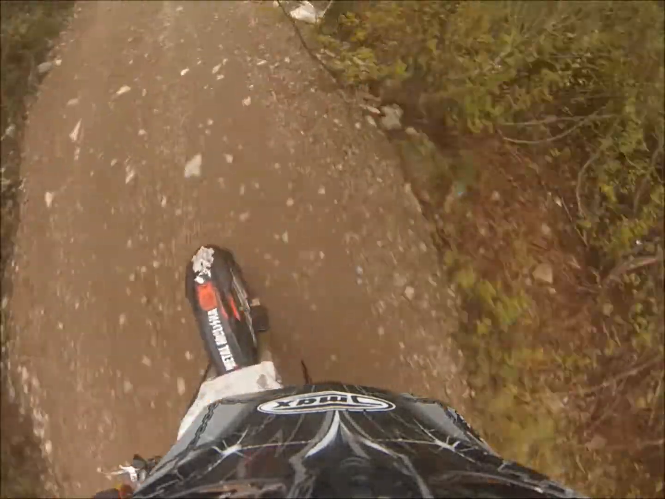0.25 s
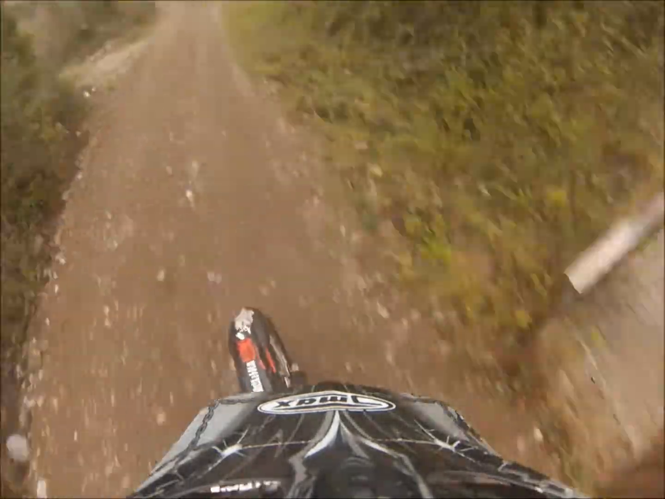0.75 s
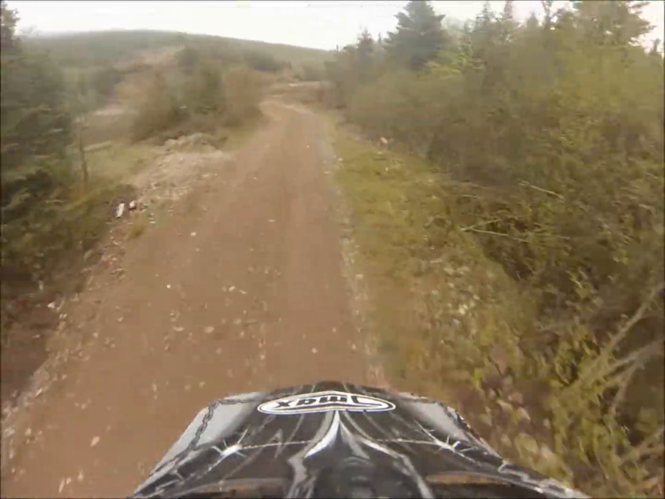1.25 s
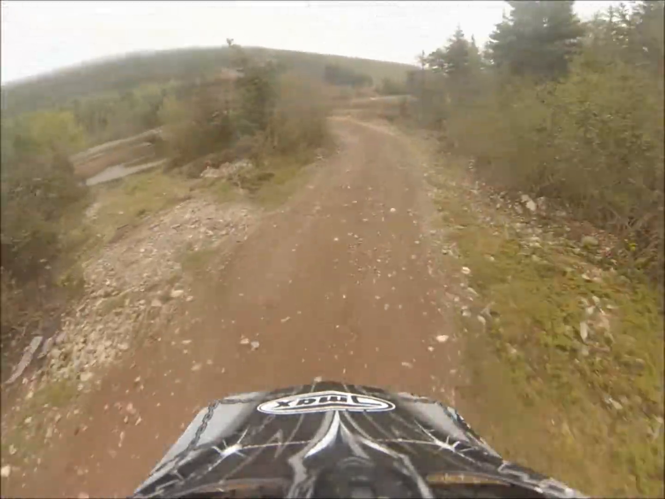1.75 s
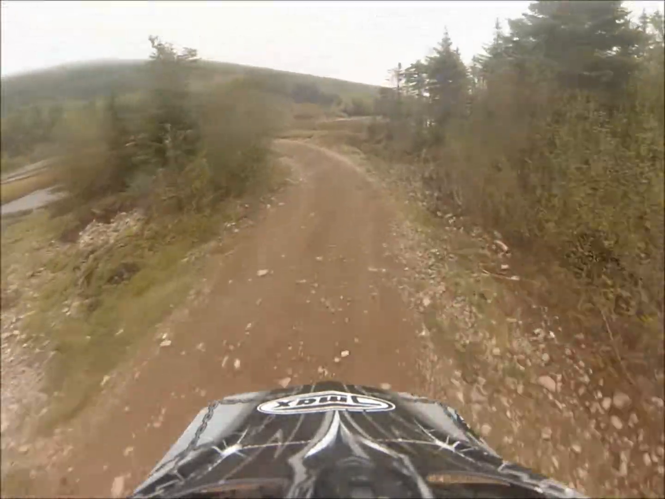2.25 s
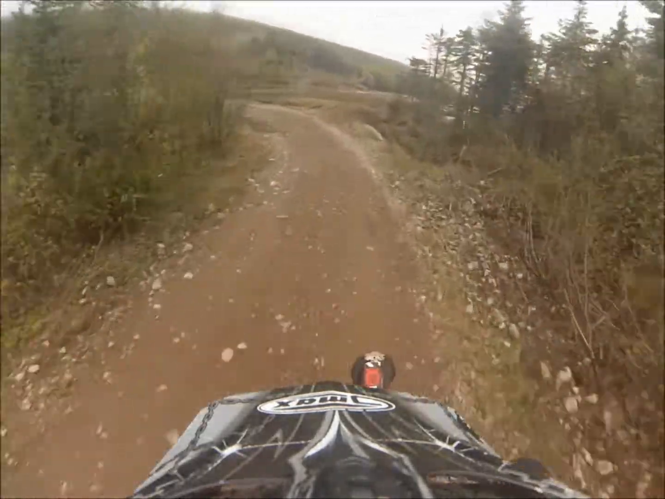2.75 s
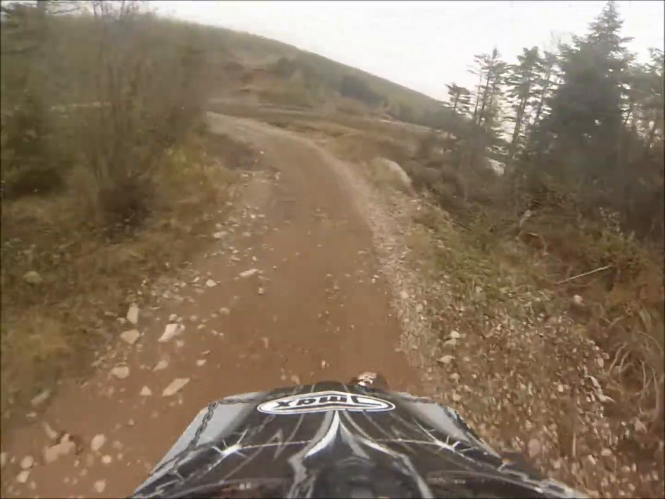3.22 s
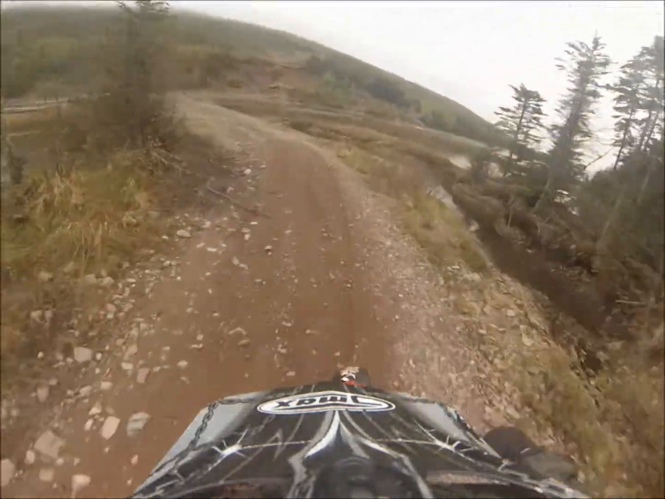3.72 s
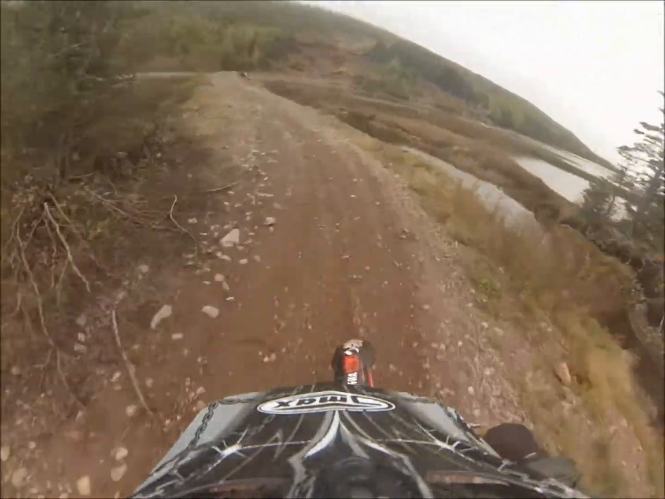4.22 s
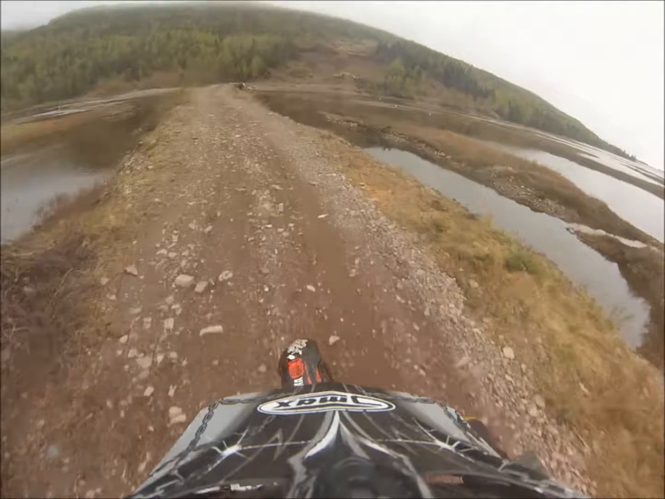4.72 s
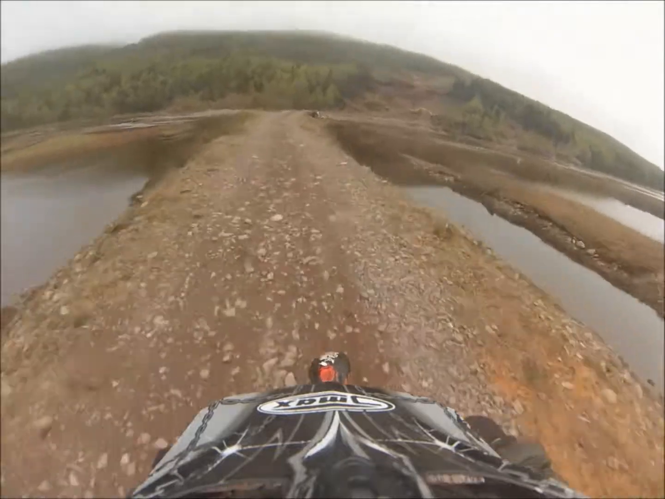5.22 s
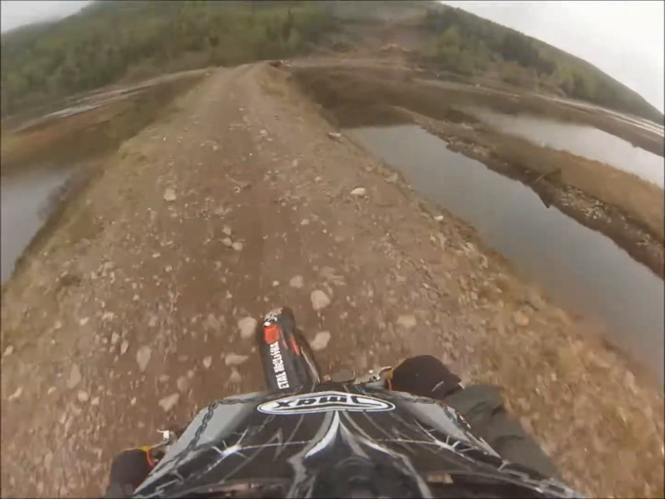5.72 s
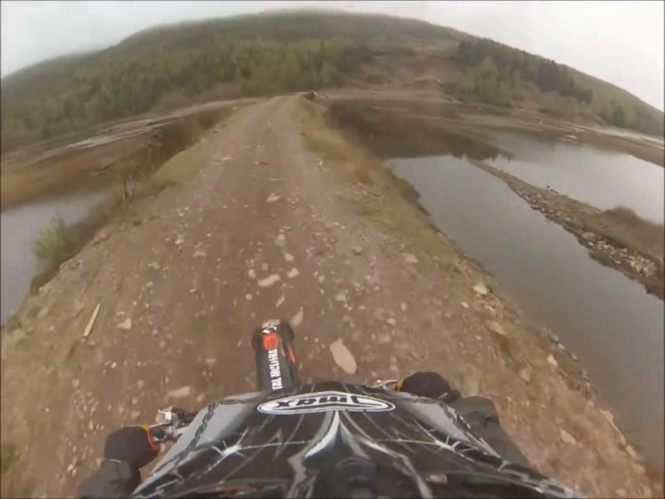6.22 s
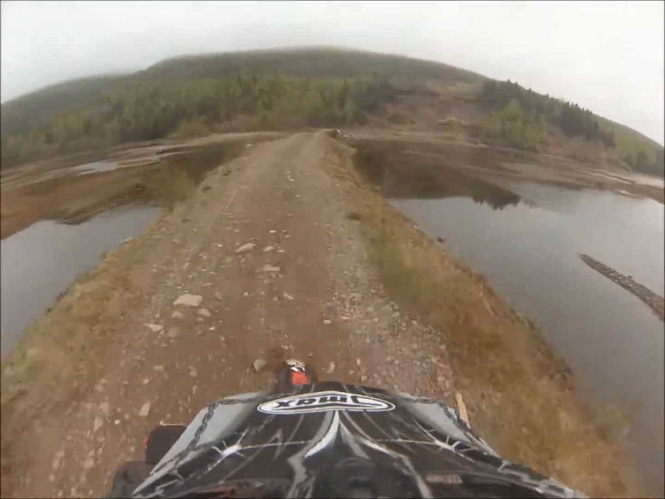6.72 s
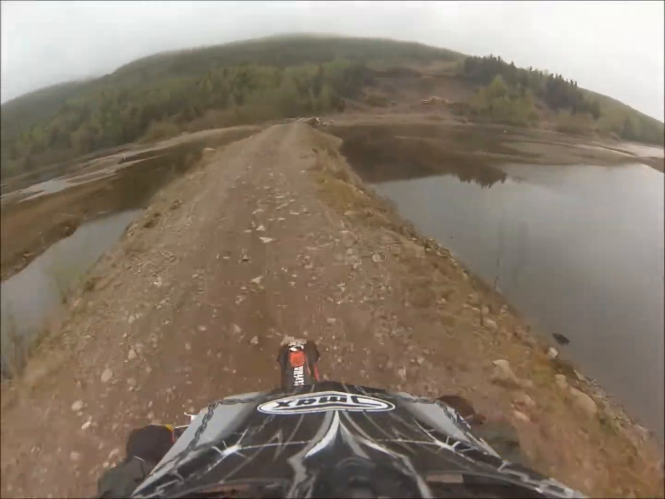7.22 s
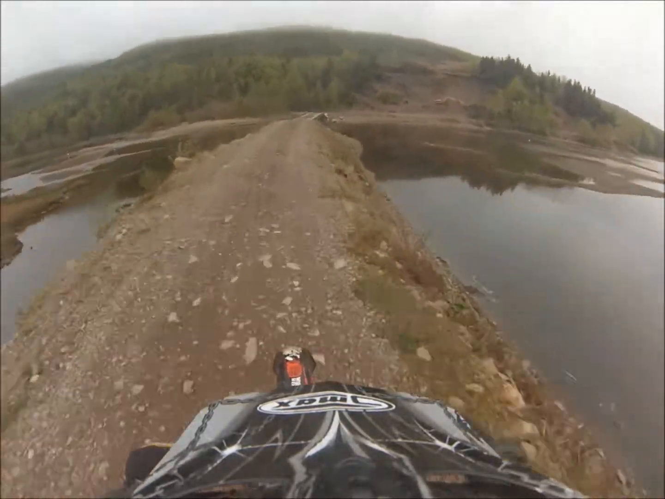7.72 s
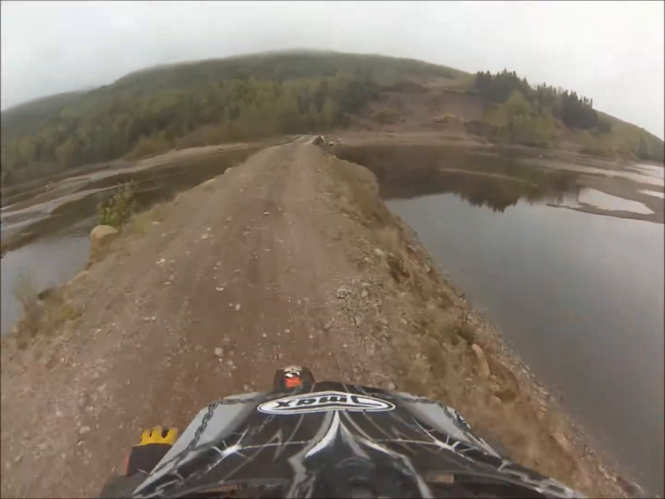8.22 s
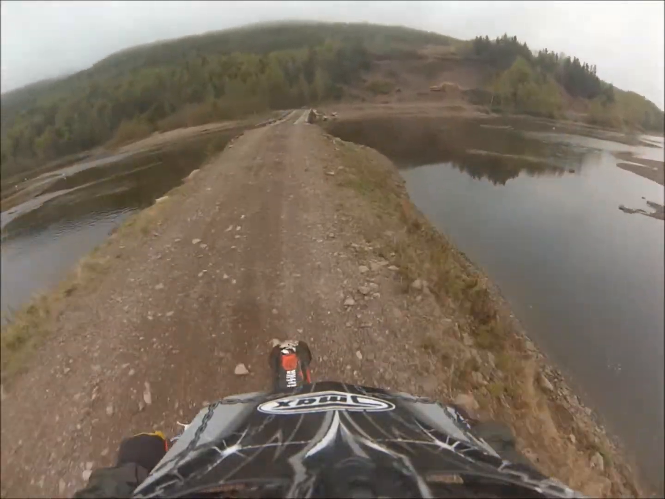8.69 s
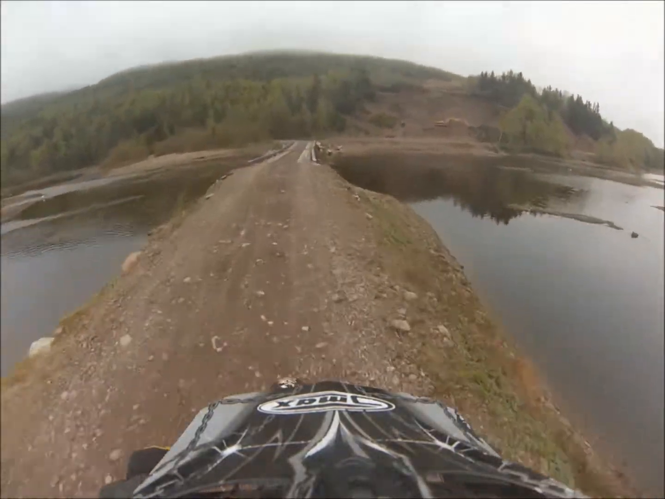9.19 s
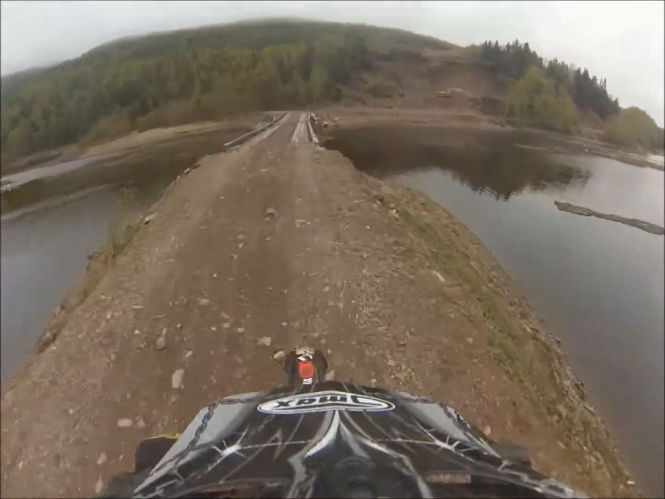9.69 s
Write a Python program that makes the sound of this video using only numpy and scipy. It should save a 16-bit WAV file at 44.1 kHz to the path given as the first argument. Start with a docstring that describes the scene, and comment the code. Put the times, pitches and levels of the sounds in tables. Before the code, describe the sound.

A single-cylinder dirt bike coasts along a gravel trail, its engine puttering and clattering at low speed. About halfway it barks through one short, loud rev, followed by a hard thump as the throttle shuts. It rolls on and slows, with two light throttle flicks near the end. The microphone on the rider's helmet picks up low wind buffeting, dull bumps, knocks from the frame and a faint tyre hiss throughout.

```python
"""A single-cylinder four-stroke dirt bike on a gravel trail, heard from a camera on the rider's helmet.
Each firing excites the resonances of the exhaust pipe. The bike coasts with a clattering engine,
barks through one short rev, then rolls on and slows with two flicks of the throttle.
Impacts ring the helmet shell, frame and fender, wind buffets the microphone and the tyres hiss;
two hard jolts duck the camera's limiter."""
import sys
import numpy as np
from scipy import signal
from scipy.fft import rfft, irfft, next_fast_len
from scipy.io import wavfile
from scipy.ndimage import uniform_filter1d, minimum_filter1d, map_coordinates

SR = 44100
rng = np.random.default_rng(int(sys.argv[2]) if len(sys.argv) > 2 else 0)


def generate_wav(sig):
    """Save sig (samples, or channels by samples) to the path in sys.argv[1] as 16-bit PCM at SR."""
    pcm = np.round(np.clip(np.atleast_2d(sig).T, -1, 1) * 32767).astype(np.int16)
    wavfile.write(sys.argv[1], SR, pcm)


N = 438794
TIME = np.arange(N) / SR
CRUISE_HZ = 32.1  # reference firing rate

# Flicks of the throttle. Each row: start in seconds, added opening (0-1), added firing rate in Hz,
# added clatter in dB.
BLIPS = [(8.579, 0.28, 8, 3), (8.971, 0.26, 8.5, 4.5)]
# Looseness of the gravel, in two lists: before and after the rev. Each row: time in seconds, level in dB.
GRAVEL = [
    [(0.0, -61), (0.57, -58.5), (0.99, -60), (1.5, -55.5), (1.72, -53), (1.95, -61.5), (2.41, -63),
     (4.2, -67)],
    [(5.45, -53.5), (5.6, -55.5), (6.63, -60), (7.0, -54.5), (8.18, -55), (8.51, -58.5), (9.23, -61.5),
     (9.71, -67.5), (9.95, -68)],
]
# Spectrum of a tick on the camera housing. Each row: frequency in Hz, gain in dB.
HOUSING = [(2000, -28), (4500, -20), (6300, -6.5), (8000, -11), (10000, -5), (12000, -14.5), (15000, -16)]


def engine(throttle, cycles, rate):
    """Periodic excitation: one train of firings times the exhaust, its bark and the valve clatter."""
    times = np.interp(np.arange(np.ceil(cycles[0]), cycles[-1]), cycles, TIME)
    firing_hz = np.interp(times, TIME, rate)
    jitter, strength, charge, first_tap, second_tap, echo = rng.standard_normal((len(times), 6)).T
    # spinning freely after a blip, the engine fires more evenly and clatters louder
    free_spin = amp(sum(db * triangle(start, .25, .3) for start, _, _, db in BLIPS))
    # firings are ragged at low speed and small throttle
    ragged = np.interp(throttle, [.3, .5], [1, .15]) * np.interp(rate, [29, 33], [1, .45])
    ragged = np.interp(times, TIME, ragged / free_spin ** 2)
    sizes = amp(3.2 * ragged * strength) / np.sqrt(firing_hz)
    pulses = unit(impulses(times + .00018 * ragged * jitter, sizes))
    breath = amp(-5) * exhaust(pulses, throttle) + amp(-1) * (1 - throttle) * intake(cycles, rate)
    return (exhaust_level(throttle, rate) * breath
            + bark(times, firing_hz, throttle, charge_db=2.2 * charge, echo_db=3 * echo)
            + crack(pulses, throttle)
            + free_spin * clatter_level(rate) * np.sqrt(1 - throttle ** 2)
            * clatter(times, firing_hz, first_tap, second_tap)
            + honk(throttle, cycles, rate))


def drive():
    """Throttle opening and firing rate; the flywheel's inertia makes the rate lag each blip."""
    # The one long pull. Each row: time in seconds, throttle opening (0-1).
    pull = [(3.6, 0.37), (3.85, 0.42), (4.22, 0.44), (4.35, 0.55), (4.53, 0.63), (4.585, 0.82),
            (4.78, 0.87), (4.9, 0.79), (5.02, 0.66), (5.13, 0.2)]
    # Engine speed in gear. Each row: time in seconds, firing rate in Hz.
    speed = [(0, 32), (.53, 30.7), (.78, 31.5), (.9, 30.7), (1.03, 31.7), (1.52, 31.6), (1.65, 29.2),
             (2.25, 28.9), (2.43, 30.4), (3.02, 26), (3.2, 27), (3.6, 26), (3.84, 28.1), (3.92, 25.7),
             (4.18, 25.8), (4.57, 31.8), (4.63, 37), (4.75, 43.3), (4.86, 47), (4.95, 42), (5.45, 38),
             (5.72, 34.9), (6.03, 33), (6.17, 34.4), (6.3, 33.2), (6.53, 33.1), (6.62, 35.8), (6.75, 34.3),
             (7, 34.8), (7.27, 33.6), (7.6, 34.6), (7.8, 31.9), (7.9, 33.4), (8.05, 32.4), (8.3, 29.4),
             (8.58, 28), (8.95, 24.7), (9.95, 22)]
    throttle = curve(pull) + sum(opening * triangle(start, .074, .16) for start, opening, _, _ in BLIPS)
    rate = curve(speed) + sum(hz * triangle(start, .11, .24) for start, _, hz, _ in BLIPS)
    return np.clip(throttle, 0, 1), rate


def crank(throttle, smooth_rate, firing_at_s=4.586):
    """Phase in cycles is the integral of the firing rate, which ruts make waver more when coasting."""
    coasting = np.clip(1 - 3 * throttle, 0, 1)
    rate = smooth_rate * (1 + (.002 + .005 * coasting) * wobble(9))
    cycles = np.cumsum(rate) / SR
    return cycles - np.interp(firing_at_s, TIME, cycles), rate


def exhaust(pulses, throttle):
    """Source and filter: the pulses ring the pipe, whose resonances change as the throttle opens."""
    # Pulse spectra at shut, half and wide-open throttle. Each row: frequency in Hz, gain in dB.
    shut = [(40, -74.5), (110, -12), (140, 17), (165, 10), (205, 4.5), (260, -28.5), (320, 11.5), (370, 4),
            (420, -20.5), (500, -1.5), (570, -4), (620, -13.5), (800, -38.5), (5000, -110)]
    half_open = [(40, 0.5), (110, -19), (155, 1), (240, -6.5), (290, 1), (325, 8), (385, -20.5),
                 (450, -8.5), (510, -1.5), (540, -19.5), (620, -6.5), (740, -24.5), (5000, -110)]
    wide_open = [(40, -5), (135, -4), (178, 9), (225, -5), (270, 5), (320, 1), (390, 1), (460, 1), (560, 3),
                 (640, 11), (760, -13.5), (5000, -110)]
    shares = [np.sqrt(np.interp(throttle, [0, .5, 1], row)) for row in np.eye(3)]
    return sum(share * unit(colour(pulses, spectrum))
               for share, spectrum in zip(shares, (shut, half_open, wide_open)))


def exhaust_level(throttle, rate, braking_from_hz=30.6):
    """Powers add: a quiet idle, a drone when the engine brakes the bike, a roar under throttle."""
    idle = amp(-52.5) * rate / CRUISE_HZ
    braking = 1 / (1 + np.exp((braking_from_hz - rate) / .7))
    roar = amp(-23.5) * throttle ** 2.46
    return np.sqrt(idle ** 2 + braking * amp(-38.5) ** 2 + roar ** 2)


def bark(times, firing_hz, throttle, charge_db, echo_db, echo_s=.0047):
    """A hard pressure edge and a blast of gas leave the pipe, reflected once by its open end."""
    # Spectrum of the blast. Each row: frequency in Hz, gain in dB.
    spectrum = [(300, -13), (600, 8.5), (830, -16), (1070, 3), (1180, -5), (1490, 6), (1820, -13),
                (1980, -3), (2500, -13.5), (2970, -19), (3740, -12), (5800, -26), (7560, -23), (15500, -59)]
    charge = (CRUISE_HZ / firing_hz) ** 1.5 * amp(charge_db)  # a slow engine draws a bigger charge
    reflection = .35 * impulses(times + echo_s, charge * amp(echo_db))
    pulses = unit(impulses(times, charge) + reflection)
    edge = signal.sosfilt(signal.butter(2, 2200, fs=SR, output="sos"), pulses)
    blast = unit(bursts(pulses, attack=.001, decay=.0022))
    return amp(-21.5) * throttle ** 3.6 * unit(colour(edge + .45 * blast, spectrum))


def crack(pulses, throttle):
    """A steep front is rich in treble: under load each firing cracks."""
    # Spectrum of the front. Each row: frequency in Hz, gain in dB.
    spectrum = [(1000, 3), (2500, 6), (3000, -13), (3800, -7), (4600, -14), (5250, 9), (5900, -10),
                (7500, -8.5), (11000, -10.5), (15500, -30)]
    fronts = bursts(pulses, attack=.0004, decay=.0011)
    return amp(-47.5) * throttle ** 4.6 * unit(colour(fronts, spectrum))


def intake(cycles, rate):
    """The piston gulps air between firings; its harmonics glide through the airbox's fixed resonances."""
    # Tones of the gulp. Each row: harmonic number, relative level in dB.
    harmonics = [(4, -9.5), (5, -1.5), (6, -7), (7, -10), (8, -5), (9, -11), (10, -5), (11, -2.5),
                 (17, -4.5)]
    # Response of the airbox. Each row: frequency in Hz, gain in dB.
    airbox = [(110, 3.5), (160, 4), (188, -2), (230, 2.5), (275, -6.5), (320, 1.5), (400, -22.5),
              (500, -10), (600, -10), (750, -13)]
    tones = np.zeros(N)
    for k, db in harmonics:
        level = amp(db + 2 * wobble(13) + np.interp(k * rate, *np.transpose(airbox)))
        tones += level * np.cos(2 * np.pi * k * (cycles - .5) + 2 * wobble(.99))
    return unit(tones)


def honk(throttle, cycles, rate, from_throttle=.37):
    """Under load, harmonics near each airbox and pipe resonance beat, swelling once a cycle: a growl."""
    # Each row: resonance in Hz, half width in Hz, level at full throttle in dB, throttle exponent,
    # lag after the firing in cycles.
    resonances = [(231.5, 27, -15.5, 5.7, 0.708), (297, 18.4, -32.5, 1.47, 0.171),
                  (464, 34, -38.5, 1.5, 0.046), (592, 41, -37, 5.1, 0.065)]
    opened = np.clip(throttle - from_throttle, 0, .05) / .05
    growl = np.zeros(N)
    for hz, width, db, exponent, lag in resonances:
        harmonics = np.round(hz / rate) + np.arange(-3, 4)[:, None]
        gains = np.exp(-.7 * ((harmonics * rate - hz) / width) ** 2)
        phases = 2 * np.pi * harmonics * (cycles - lag) + .2 * wobble(35)
        tones = np.sum(gains * np.cos(phases), axis=0)
        growl += amp(db + wobble(35)) * throttle ** exponent * tones
    return opened * growl


def pipe_drone(cycles):
    """Under engine braking, single harmonics of the pipe swell and hum."""
    # Each row: centre in seconds, half length in seconds, harmonic number, level in dB.
    swells = [(.85, .65, 10, -41.5), (.8, .65, 11, -44), (.65, .3, 17, -51), (.6, .3, 16, -52),
              (1.2, .35, 15, -50), (6.05, .5, 5, -40), (6.1, .5, 6, -44), (6, .5, 7, -46),
              (6.9, .35, 10, -45), (6.2, .5, 17, -52)]
    return sum(hump(centre, half, db) * amp(1.5 * wobble(8))
               * np.cos(2 * np.pi * k * cycles + .3 * wobble(10)) for centre, half, k, db in swells)


def airbox_hoots(cycles):
    """After each blip the airbox hoots in harmonics that fall with the engine speed."""
    # Each row: harmonic number, relative level in dB.
    harmonics = [(5, 0), (6, -12), (9, -8), (10, -10), (11, -23), (15, -17.5), (16, -14), (17, -15)]
    level = sum(hump(start + .225, half=.115, db=-37) for start, *_ in BLIPS)
    return level * sum(amp(db + wobble(21)) * np.cos(2 * np.pi * k * cycles) for k, db in harmonics)


def gas_rush(throttle):
    """Flow noise: an open throttle draws a steady, rasping rush of gas."""
    # Spectrum of the flow. Each row: frequency in Hz, gain in dB.
    spectrum = [(250, -8.5), (600, 0), (830, -10), (1100, -7), (1520, 6), (1800, -9.5), (2000, 7),
                (2270, -15), (2500, -1.5), (2950, -19.5), (3800, -14), (6000, -24.5), (7600, -24),
                (11000, -34.5), (15500, -39)]
    return amp(-32) * throttle ** 2.8 * unit(colour(rng.standard_normal(N), spectrum))


def clatter(times, firing_hz, first_tap_db, second_tap_db):
    """Impact noise: valves tap twice a cycle, while chain and gears rattle at random."""
    # Spectrum of the metal parts. Each row: frequency in Hz, gain in dB.
    spectrum = [(150, -5), (340, 2.5), (430, -3.5), (600, -9), (920, -12.5), (1150, -5.5), (1350, -4.5),
                (1560, 0), (1800, -11.5), (2000, -4), (2270, -15.5), (2530, -8.5), (2950, -30),
                (6000, -34.5), (15000, -53.5)]
    taps = impulses(times, amp(first_tap_db)) + .26 * impulses(times + .5 / firing_hz, amp(second_tap_db))
    links = scatter(3000, range_db=8)
    valves = unit(bursts(taps, attack=.0027, decay=.011))
    rattle = unit(bursts(links, attack=.0001, decay=.003))
    return unit(colour(.32 * valves + .5 * rattle + .53 * rng.standard_normal(N), spectrum))


def clatter_level(rate, db_per_octave=9):
    """Impacts grow louder as the engine turns faster and as looser ground shakes the chain."""
    gravel_db = curve(np.vstack(GRAVEL))
    shaken_db = .18 * (gravel_db - gravel_db.mean())
    return amp(-42.5 + db_per_octave * np.log2(rate / CRUISE_HZ) + shaken_db)


def gear_whine(cycles, rate):
    """Forced vibration: meshing gears ring the engine case, and single gears sing at their tooth rate."""
    # Two resonances of the case. Each row: frequency in Hz, bandwidth in Hz.
    resonances = [(1590, 38), (2005, 40)]
    # Their resting levels, in dB relative to the clatter.
    resting_db = [-13, -19.5]
    # The case sings out. Each row: centre and half length in seconds, lower and upper ring in dB.
    swells = [(0.57, 0.3, -71, -58), (1.026, 0.34, -50, -78), (5.64, 0.2, -67, -49.5),
              (6.184, 0.56, -51.5, -51), (7.14, 0.25, -64, -50), (7.91, 0.14, -49, -54)]
    # Single gears. Each row: centre and half length in seconds, teeth passing per firing, level in dB.
    gears = [(.44, .12, 83, -51.5), (.56, .19, 64.5, -45.5), (.82, .09, 50, -45), (1.15, .19, 49.7, -44.5)]
    rings = [signal.lfilter(*signal.iirpeak(hz, hz / width, SR), rng.standard_normal(N))
             for hz, width in resonances]
    singing = sum(np.array([hump(centre, half, db) for db in dbs]) for centre, half, *dbs in swells)
    levels = np.hypot(np.outer(amp(resting_db), clatter_level(rate)), singing)
    mesh = sum(hump(centre, half, db) * amp(wobble(40.3))
               * np.cos(2 * np.pi * teeth * cycles + wobble(70.44)) for centre, half, teeth, db in gears)
    return mesh + sum(level * unit(ring) for level, ring in zip(levels, rings))


def chain_rasp(links_per_s=190):
    """Friction noise, modulated link by link, rings the chain guide."""
    # Each row: centre in seconds, half length in seconds, level in dB.
    rasps = [(0.527, 0.28, -60.5), (5.8, 0.44, -67)]
    # Response of the guide. Each row: frequency in Hz, gain in dB.
    guide = [(2350, -21), (2620, 16), (2900, -26), (4600, -22), (5250, 3), (5700, -16), (6100, -3),
             (6700, -2), (7200, -19), (9000, -19), (12000, -18), (15000, -31)]
    scrapes = 1 + np.cos(2 * np.pi * links_per_s * TIME + 2 * wobble(18))
    return sum(hump(*rasp) for rasp in rasps) * unit(colour(scrapes * rng.standard_normal(N), guide))


def wind(flutter, lull_db=-44):
    """Turbulent pressure buffets the microphone; gusts add in power to the air between them."""
    # Each row: centre in seconds, half length in seconds, relative level in dB.
    gusts = [(0.175, 0.36, -31), (1.08, 0.1, -39), (1.77, .2, -41), (2.7, 0.12, -35.5), (3.083, 0.2, -30.5),
             (3.58, 0.26, -31.5), (5.12, 0.13, -26), (5.42, 0.32, -29.5), (6.15, 0.38, -33.5),
             (6.677, 0.28, -29), (7.5, 0.46, -34), (8.146, 0.17, -28), (8.478, 0.31, -35.5),
             (9.296, 0.14, -29), (9.8, 0.095, -30.5)]
    # Spectrum of the buffeting. Each row: frequency in Hz, gain in dB.
    spectrum = [(8, -27.5), (14, 2), (26, 0.5), (45, -10.5), (65, -6.5), (120, -25.5), (250, -35.5),
                (1500, -78)]
    level = np.sqrt(amp(lull_db) ** 2 + sum(hump(*gust) ** 2 for gust in gusts))
    return amp(2.5) * level * unit(colour(flutter * rng.standard_normal(N), spectrum))


def helmet_boom(flutter):
    """Random shaking keeps the low resonances of the helmet shell booming between bumps."""
    # Each row: time in seconds, relative level in dB.
    shaking = [(0, -30), (.15, -25), (.6, -31), (1.05, -30), (1.3, -34), (1.7, -31.5), (2.05, -33),
               (2.55, -36.5), (3.0, -29.5), (3.6, -33.5), (3.9, -34.5), (4.23, -37), (4.72, -34.5),
               (5.1, -27.5), (5.42, -30.5), (5.75, -29.5), (6.05, -29), (6.6, -27), (7.25, -29.5),
               (7.5, -28), (8.4, -31), (8.85, -31), (9.33, -31), (9.5, -41.5), (9.7, -40.5), (9.95, -29.5)]
    # Response of the shell. Each row: frequency in Hz, gain in dB.
    shell = [(15, -33), (52, -12.5), (66, 1), (77, 0), (90, 5.5), (102, -9), (122, -14.5), (200, -25.5),
             (500, -40), (1500, -93.5)]
    return amp(curve(shaking) + .5) * unit(colour(flutter * rng.standard_normal(N), shell))


def helmet_bumps(shell_hz=80, rise_s=.0048, decay_s=.014):
    """A damped oscillator: each bump rocks the helmet shell through a few slow swings."""
    # Each row: start in seconds, relative level in dB.
    bumps = [(0.157, -18), (0.361, -23), (0.802, -18), (0.897, -21), (1.02, -24), (1.762, -18.5),
             (2.771, -18.5), (2.919, -24), (3.033, -21), (3.195, -21.5), (3.569, -22.5), (3.649, -20),
             (4.009, -28), (5.178, 4.5), (5.297, -9), (5.5, -17.5), (5.98, -22.5), (6.398, -16),
             (6.532, -18), (6.651, -16.5), (6.739, -19), (6.869, -29), (7.095, -16.5), (7.331, -27),
             (7.454, -15.5), (7.59, -17), (7.729, -20), (8.054, -19), (8.143, -17), (8.579, -18),
             (9.026, -19), (9.3, -16.5), (9.325, -20.5)]
    times, db = np.transpose(bumps)
    t = np.arange(SR // 5) / SR
    swing = -np.sin(2 * np.pi * shell_hz * t) * (1 - np.exp(-t / rise_s)) ** 2 * np.exp(-t / decay_s)
    return signal.fftconvolve(impulses(times, amp(db + 1)), swing / np.abs(swing).max())[:N]


def frame_knocks():
    """Chain and stones strike the frame: a dry contact clack and a short modal ring."""
    # Each row: start in seconds, relative level in dB.
    knocks = [(0.244, -41), (1.745, -34), (2.33, -34), (2.467, -36), (2.888, -29.5), (3.117, -30),
              (3.3646, -33), (3.7636, -26), (4.127, -37), (5.152, -26), (5.453, -28), (6.7988, -30.5),
              (7.766, -30), (7.857, -29), (8.1845, -24.5), (8.247, -29), (8.9, -29), (9.389, -33),
              (9.553, -35)]
    # Spectrum of the clack. Each row: frequency in Hz, gain in dB.
    spectrum = [(500, -14.5), (850, -13.5), (1150, 0.5), (1550, 4), (2000, -5), (2600, -14.5),
                (3000, -24.5), (4500, -22), (9000, -39.5), (15000, -52)]
    # Modes of the frame. Each row: frequency in Hz, level in dB, time to fall 60 dB in seconds.
    modes = [(1100, -4, 0.0092), (1298, -0.5, 0.023), (1488, 8.5, 0.019), (1610, -22, 0.043),
             (1994, -14, 0.072)]
    times, db = np.transpose(knocks)
    clack = colour(bursts(impulses(times, amp(db - 1)), attack=.00057, decay=.0025), spectrum)
    return clack + struck(times, db - 3.5, modes, attack=.0032)


def fender_thuds(rate, flaps_per_s=4):
    """Ruts excite the plastic fender's hollow modes; lighter flaps between fade as the engine slows."""
    # Each row: start in seconds, relative level in dB.
    thuds = [(0.241, -25.5), (.42, -25.5), (1.736, -27.5), (1.951, -33), (2.367, -33), (2.467, -31),
             (2.567, -31.5), (2.671, -34), (2.89, -30), (3.368, -31), (3.523, -32), (3.637, -39),
             (3.776, -32), (3.972, -33), (5.455, -25), (5.658, -26), (6.076, -27), (6.136, -28.5),
             (7.07, -32), (7.332, -32), (7.893, -26.5), (8.012, -29), (8.189, -28), (9.005, -30),
             (9.39, -32), (9.766, -41), (9.881, -45)]
    # Modes of the fender. Each row: frequency in Hz, level in dB, time to fall 60 dB in seconds.
    modes = [(320, -5.5, 0.1), (356.5, -0.5, 0.073), (451, -6.5, 0.055), (560, -8, 0.035)]
    times, db = random_hits(flaps_per_s, mean_db=-43, spread_db=3)
    flaps = (rate / CRUISE_HZ) ** 2 * struck(times, db, modes, attack=.002)
    return struck(*np.transpose(thuds), modes, attack=.0021) + flaps


def tyres():
    """Many tiny impacts merge into a hiss that follows the gravel; flung stones tick on the bike."""
    # Spectrum of the hiss. Each row: frequency in Hz, gain in dB.
    spectrum = [(1500, -25), (3000, 4), (3700, 8.5), (5100, 3.5), (5900, -5), (7000, -8), (7550, 2.5),
                (8200, -23), (11500, -19), (13000, -28), (15500, -44)]
    grit = unit(bursts(scatter(2500, range_db=26), attack=.0001, decay=.0005))
    hiss = unit(colour(rng.standard_normal(N) + .5 * grit, spectrum))
    times, db = random_hits(per_s=7, mean_db=-8, spread_db=3)
    stones = colour(bursts(impulses(times, amp(db)), attack=.0005, decay=.0017), HOUSING)
    gravel_db = curve(np.vstack(GRAVEL))
    level_db = gravel_db.mean() - .5 + .88 * (gravel_db - gravel_db.mean())
    return amp(level_db) * (hiss + stones)


def housing_ticks():
    """Brief impacts excite the high resonances of the camera housing."""
    # Each row: start in seconds, relative level in dB.
    ticks = [(0.817, -40.5), (1.015, -52), (1.6931, -50), (5.187, -23), (5.305, -40), (5.557, -42),
             (5.735, -35.5), (6.748, -47), (7.3576, -53), (7.4594, -49), (8.511, -41.5), (9.005, -38.5),
             (9.4, -44), (9.519, -43.5)]
    times, db = np.transpose(ticks)
    return colour(bursts(impulses(times, amp(db - 9.5)), attack=.0011, decay=.0016), HOUSING)


def fork_swishes():
    """Each compression of the fork gives a short swell of band-limited noise."""
    # Each row: centre in seconds, level in dB.
    strokes = [(.19, -54.5), (.35, -51.5), (0.431, -52.5), (1.66, -59), (2.77, -52.5), (2.92, -54.5),
               (3.18, -53.5), (3.45, -59), (3.77, -57), (3.94, -59), (4.148, -60), (5.52, -50), (5.68, -48),
               (7.18, -55), (7.579, -52), (8.86, -57), (9.285, -55.5), (9.401, -56), (9.57, -58),
               (9.7, -59.5)]
    # Spectrum of the swish. Each row: frequency in Hz, gain in dB.
    spectrum = [(2000, -16), (3200, -2.5), (3800, 5.5), (5500, -4), (7000, -4.5), (9000, -14.5),
                (12000, -18), (15000, -48)]
    level = sum(hump(centre, .016, db) for centre, db in strokes)
    return level * colour(rng.standard_normal(N), spectrum)


def amp(db):
    """Decibels to amplitude gain."""
    return 10 ** (np.asarray(db) / 20)


def unit(x):
    """The signal scaled to rms 1."""
    return x / np.sqrt(np.mean(x ** 2) + 1e-20)


def curve(rows):
    """Linear interpolation of (seconds, value) rows at every sample."""
    return np.interp(TIME, *np.transpose(rows))


def hump(centre, half, db):
    """A Gaussian swell of gain, down to 1/e at half seconds from its centre."""
    return amp(db) * np.exp(-((TIME - centre) / half) ** 2)


def triangle(start, rise, fall):
    """A straight rise from 0 to 1 and a straight fall back, timed in seconds."""
    return np.interp(TIME, [start, start + rise, start + rise + fall], [0, 1, 0])


def wobble(knots_per_s):
    """A smooth curve through random knots."""
    coarse = np.linspace(0, N / SR, 4000)
    knots = rng.standard_normal(int(N * knots_per_s / SR) + 4)
    return np.interp(TIME, coarse, map_coordinates(knots, [coarse * knots_per_s]))


def impulses(times, sizes):
    """A train of one-sample pushes."""
    return np.bincount(np.clip(np.round(times * SR).astype(int), 0, N), sizes, N + 1)[:N]


def scatter(count, range_db):
    """Impulses spread uniformly in time and in decibels."""
    position, strength = rng.random((count, 2)).T
    return impulses(position * N / SR, amp(range_db * strength))


def random_hits(per_s, mean_db, spread_db):
    """Random times in seconds, with normally distributed levels in dB."""
    count = int(per_s * N / SR)
    return rng.random(count) * N / SR, mean_db + spread_db * rng.standard_normal(count)


def bursts(train, attack, decay):
    """Each impulse sets off a puff of noise; attack and decay are time constants in seconds."""
    t = np.arange(SR // 10) / SR
    envelope = (1 - np.exp(-t / attack)) * np.exp(-t / decay)
    return signal.fftconvolve(train, envelope / envelope.max())[:N] * rng.standard_normal(N)


def struck(times, db, modes, attack):
    """Modal superposition: every blow rings the damped modes at new strengths."""
    t = np.arange(SR // 8) / SR
    strengths = amp(db[:, None] + 2 * rng.standard_normal((len(times), len(modes))))
    onset = 1 - np.exp(-t / attack)
    rings = [amp(level - 60 * t / t60) * np.sin(2 * np.pi * hz * t) * onset for hz, level, t60 in modes]
    return sum(signal.fftconvolve(impulses(times, sizes), ring)[:N]
               for sizes, ring in zip(strengths.T, rings))


def colour(x, spectrum, size=16384):
    """A minimum-phase filter of unit energy, shaped by (Hz, dB) rows."""
    hz, db = np.transpose(spectrum)
    log_hz = np.log(np.fft.rfftfreq(size, 1 / SR) + 1)
    cepstrum = irfft(np.log(amp(np.interp(log_hz, np.log(hz), db))))
    causal_fold = np.r_[1, np.full(size // 2 - 1, 2), 1, np.zeros(size // 2 - 1)]
    response = irfft(np.exp(rfft(cepstrum * causal_fold)))
    return signal.fftconvolve(x, response / np.linalg.norm(response))[:N]


def scene():
    """Superposition: all sources add at the one microphone on the helmet."""
    throttle, smooth_rate = drive()
    cycles, rate = crank(throttle, smooth_rate)
    bike = (engine(throttle, cycles, rate) + pipe_drone(cycles) + airbox_hoots(cycles)
            + gas_rush(throttle) + gear_whine(cycles, smooth_rate) + chain_rasp())
    flutter = amp(2.4 * wobble(17))  # wind and shell rise and fall together
    ride = wind(flutter) + helmet_boom(flutter) + tyres()
    jolts = helmet_bumps() + frame_knocks() + fender_thuds(smooth_rate) + housing_ticks() + fork_swishes()
    return (bike + ride + jolts)[None]


def record(dry, ceiling_db=-10, release_db_per_s=75, top_hz=15350):
    """Peak limiting: the gain ducks at once and recovers steadily; a sharp low-pass follows."""
    over_db = np.maximum(20 * np.log10(np.abs(dry[0]) + 1e-9) - ceiling_db, 0)
    recovery_db = release_db_per_s * TIME
    duck_db = np.maximum.accumulate(over_db + recovery_db) - recovery_db
    gain = uniform_filter1d(minimum_filter1d(amp(-duck_db), size=120), size=120)
    size = next_fast_len(N + SR // 4)
    passband = np.fft.rfftfreq(size, 1 / SR) < top_hz
    return irfft(rfft(dry * gain, size) * passband, size)[:, :N]


dry = scene()
out = record(dry)
generate_wav(out)
```